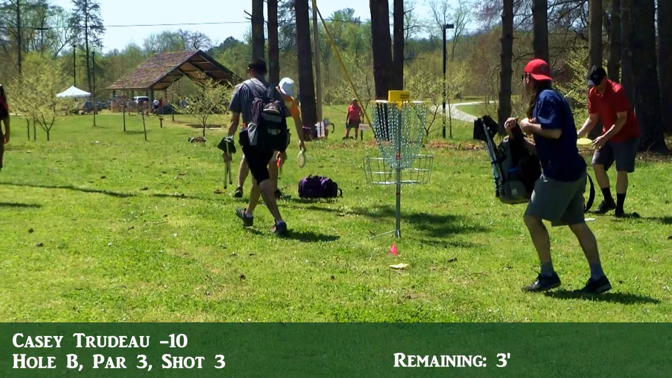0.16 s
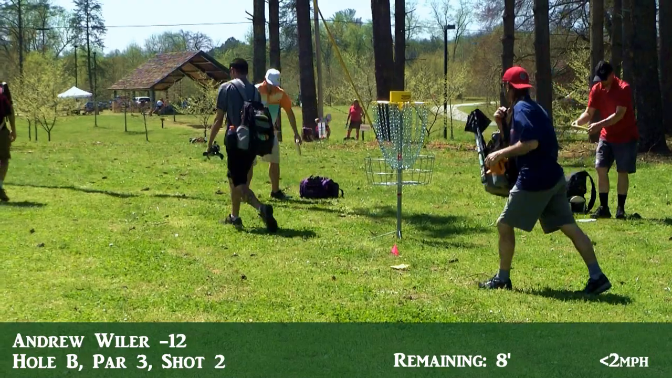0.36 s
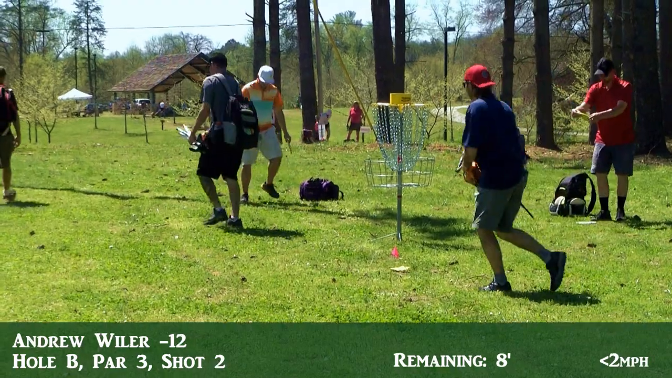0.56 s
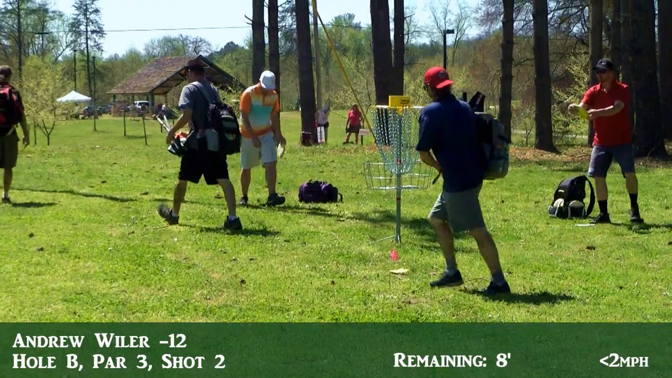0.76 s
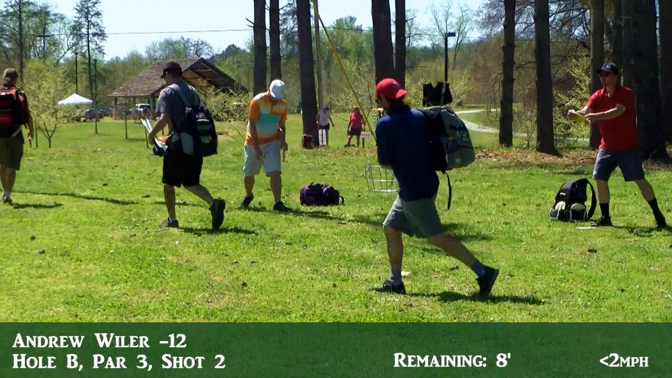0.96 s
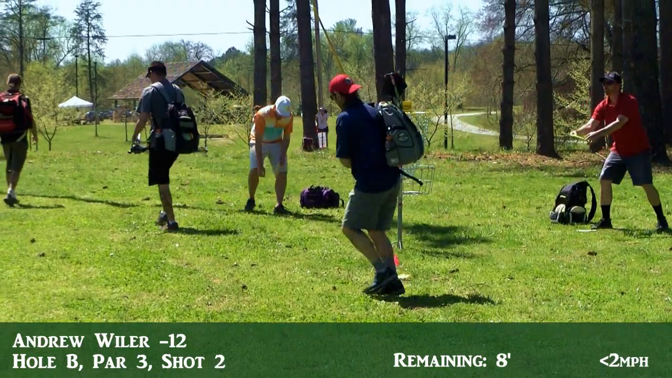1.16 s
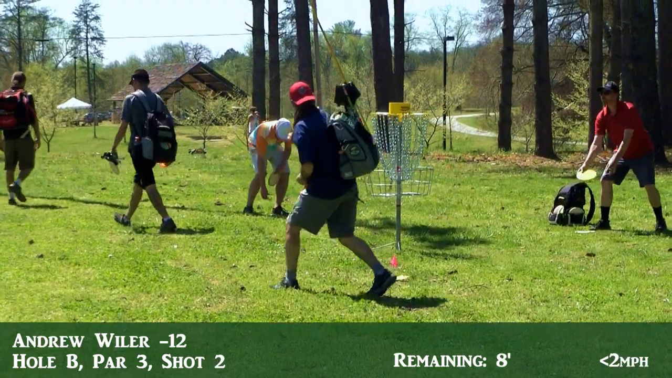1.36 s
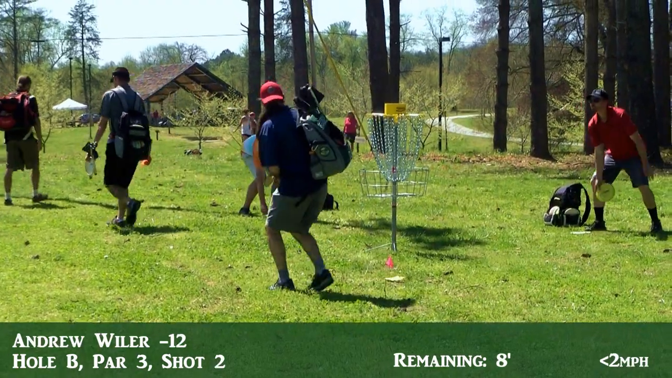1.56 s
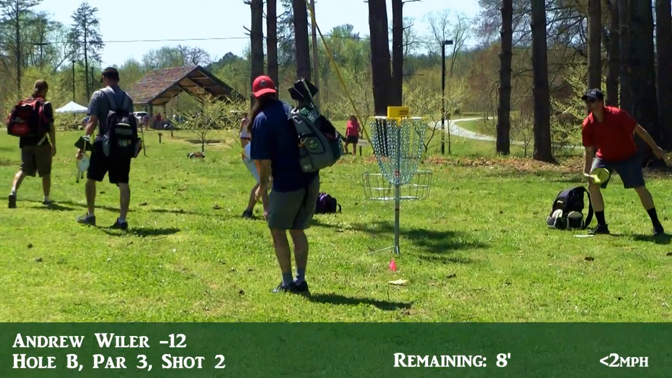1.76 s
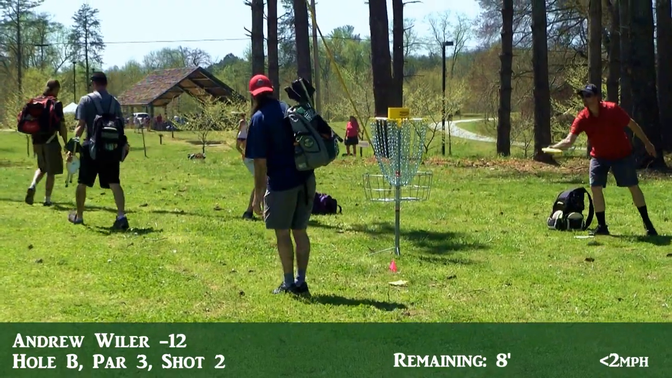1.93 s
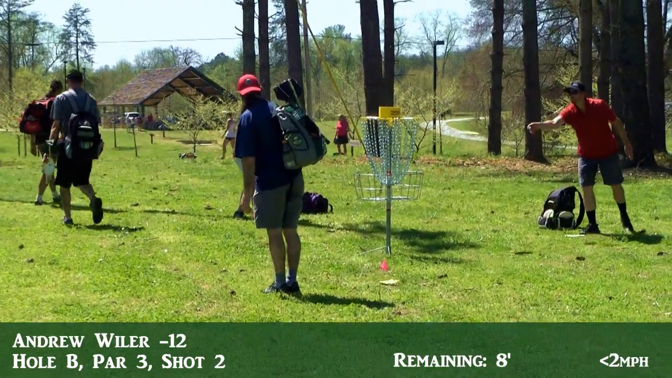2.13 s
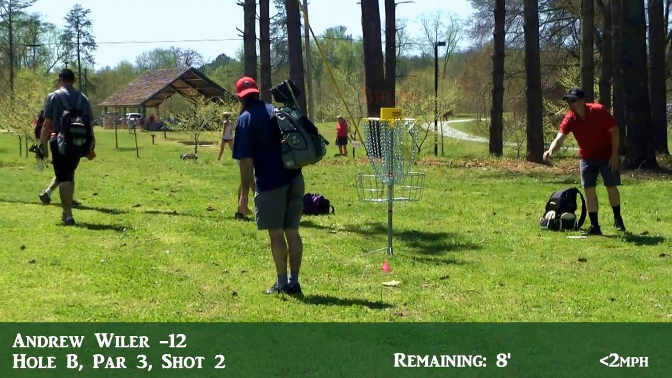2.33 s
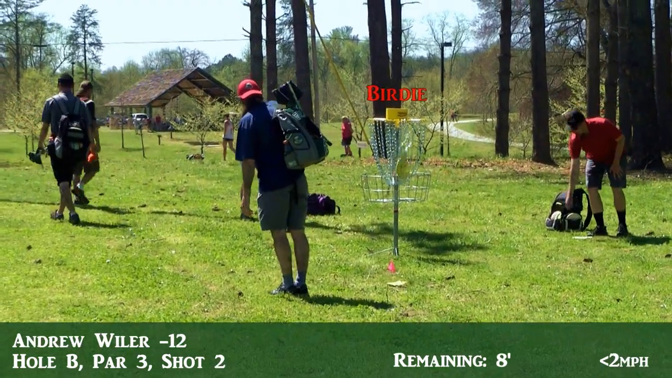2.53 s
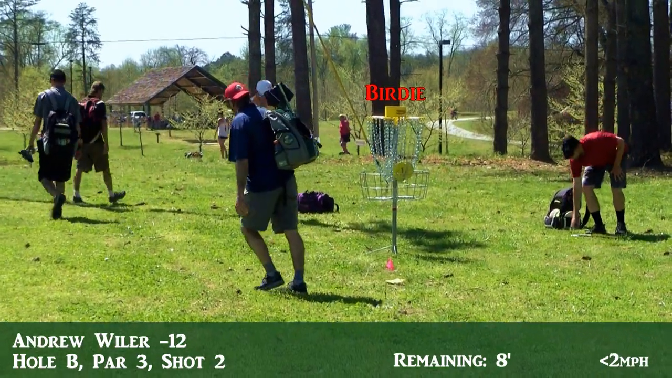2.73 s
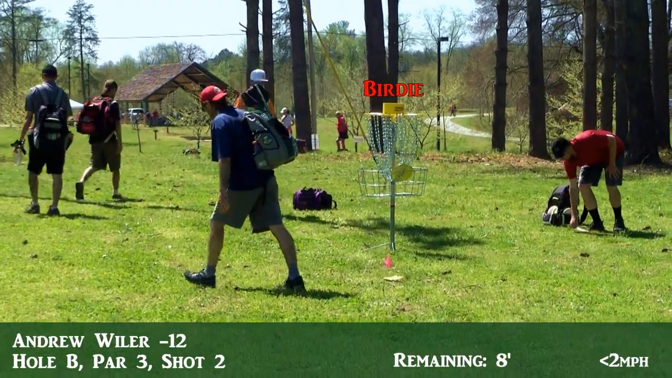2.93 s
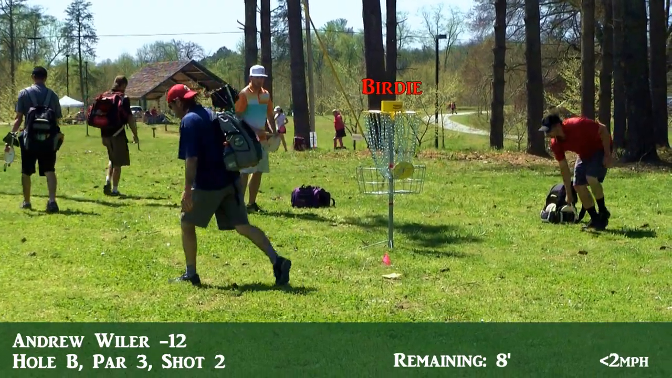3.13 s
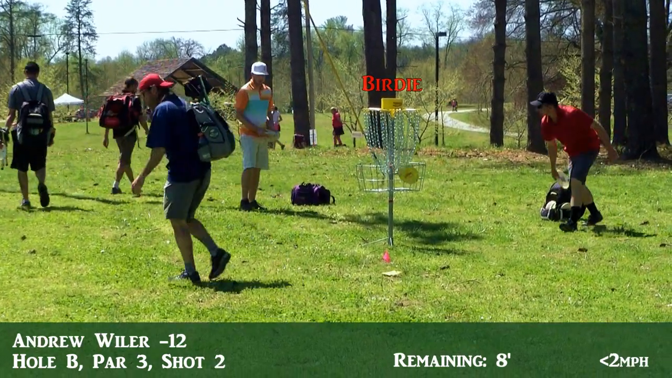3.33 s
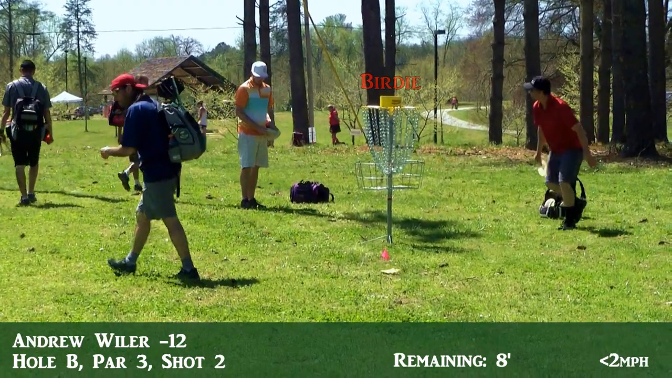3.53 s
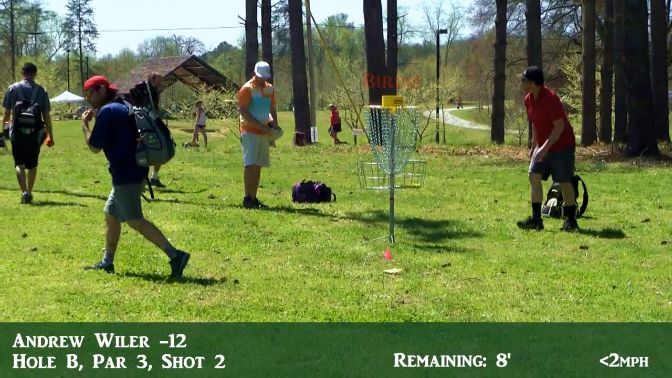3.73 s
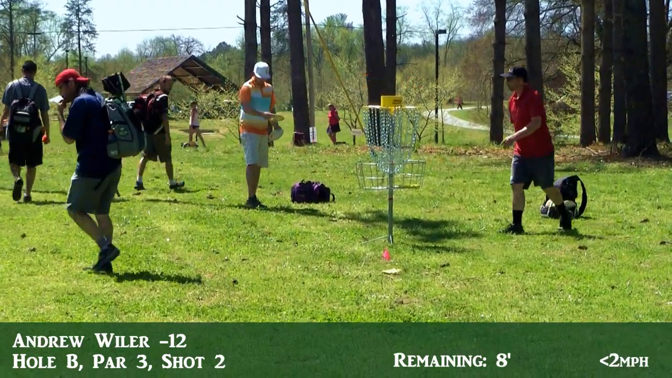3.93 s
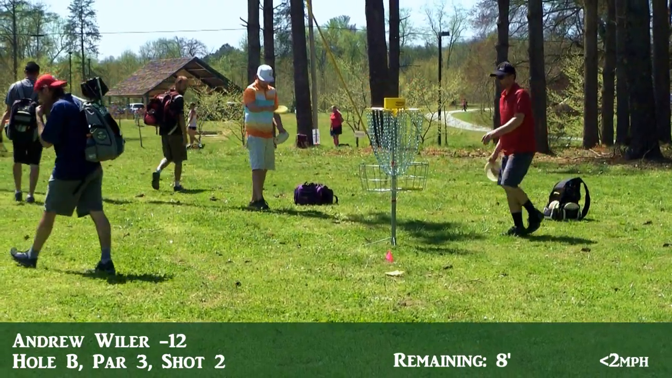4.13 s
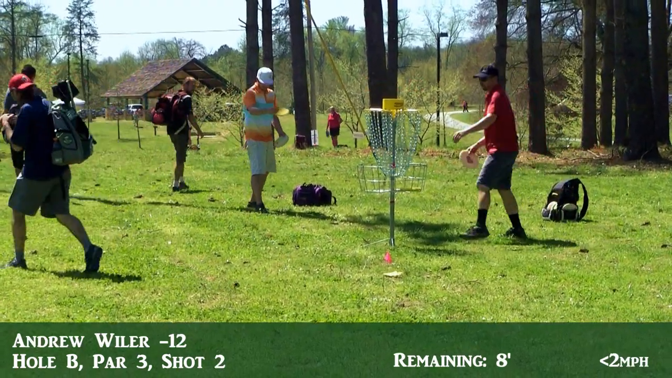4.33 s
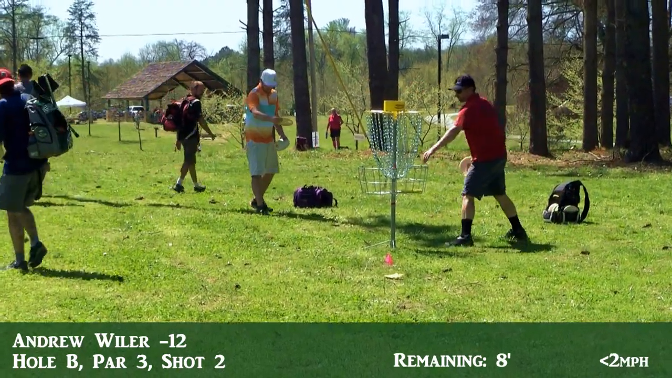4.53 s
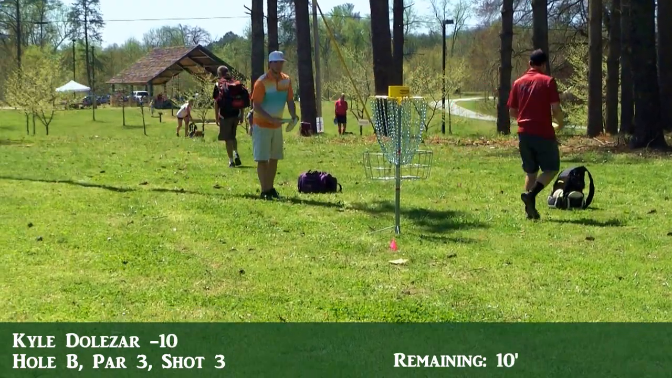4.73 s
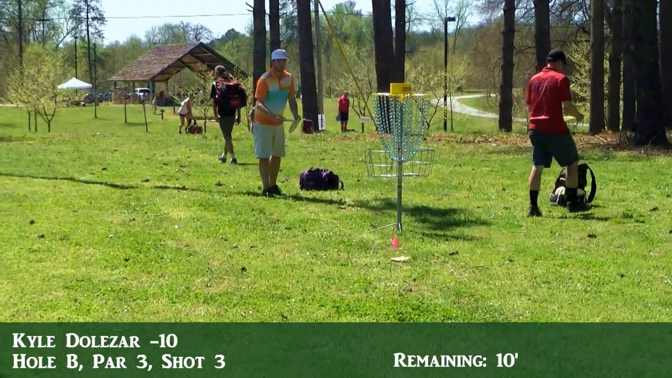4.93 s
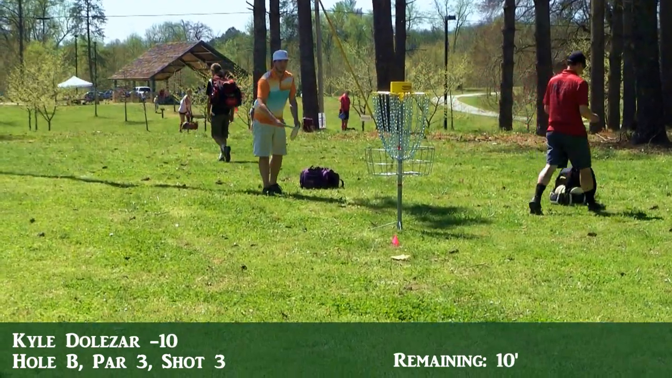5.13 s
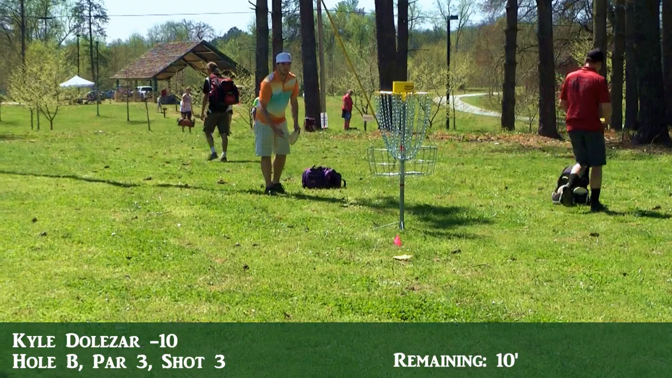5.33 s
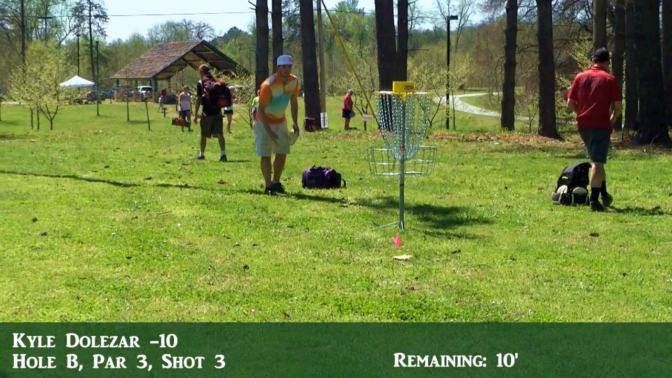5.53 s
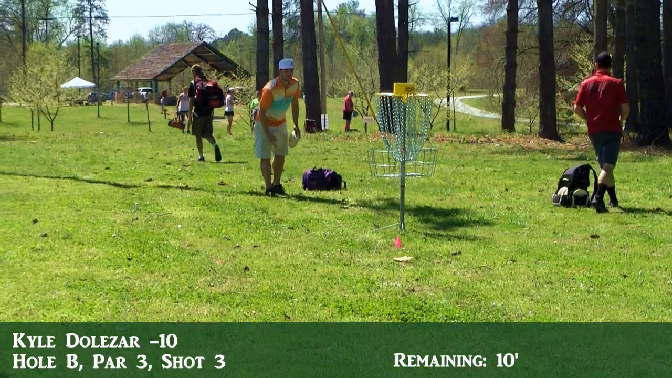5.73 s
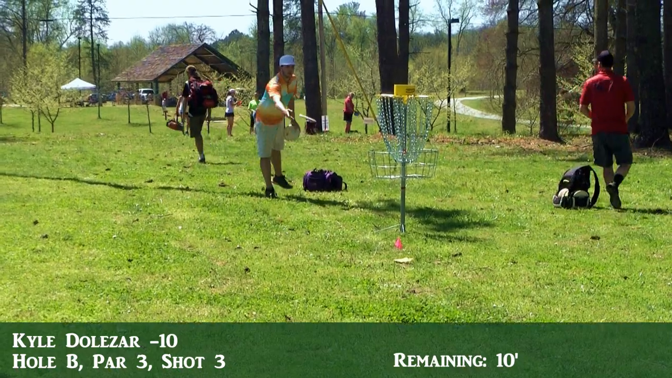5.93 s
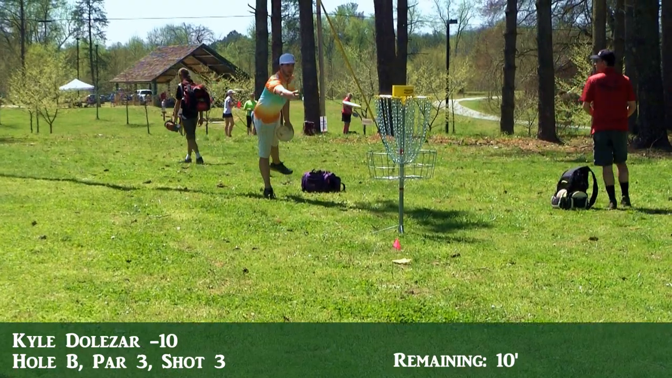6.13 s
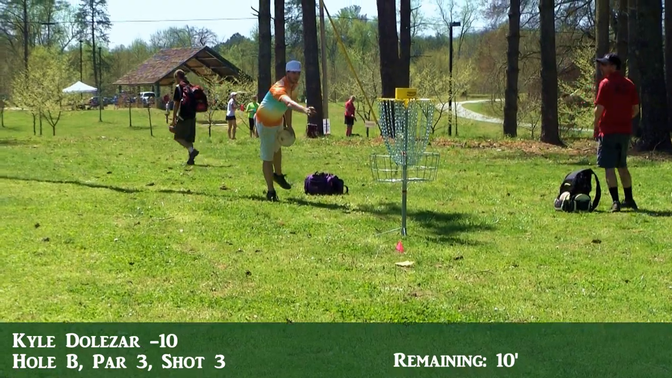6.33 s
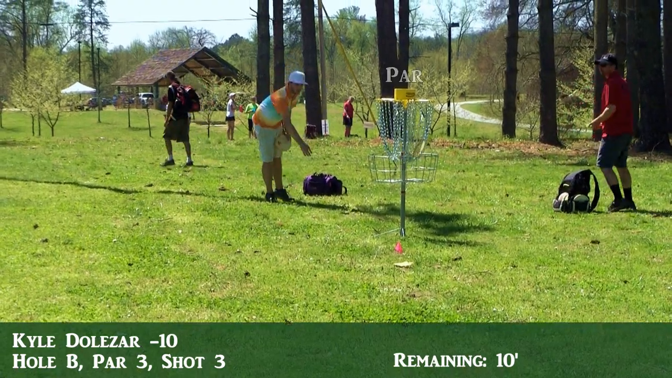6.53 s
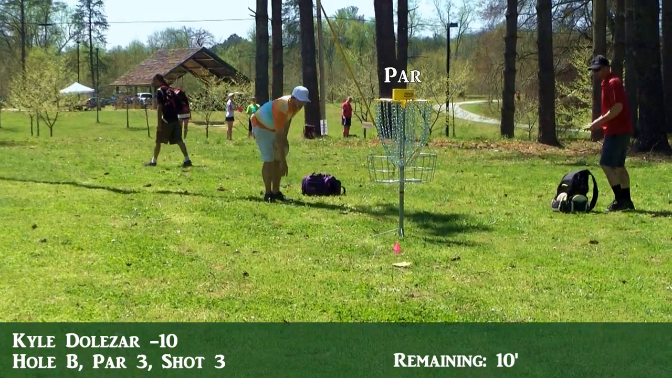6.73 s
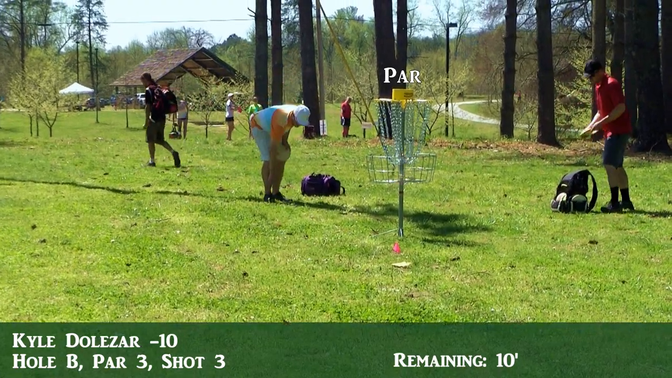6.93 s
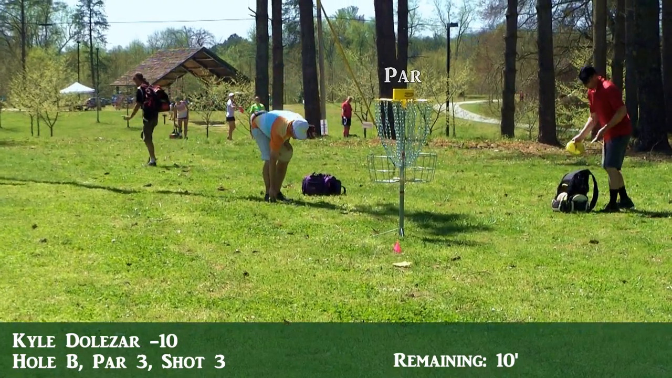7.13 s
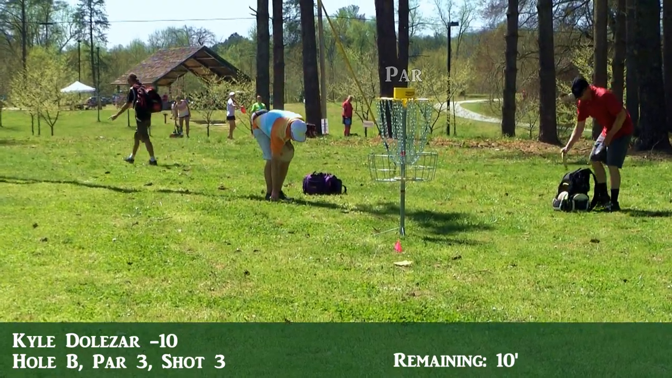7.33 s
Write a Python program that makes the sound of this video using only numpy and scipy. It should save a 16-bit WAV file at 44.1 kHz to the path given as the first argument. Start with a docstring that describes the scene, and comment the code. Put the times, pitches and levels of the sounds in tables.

```python
"""The hanging chains of a steel disc basket, hit by two putts, clatter, jingle and sway on: random link contacts
click and ring modal strands. The ring that gathers them chimes as decaying steel modes; single links clink.
The plastic disc slaps as coloured, quickly dying bursts. Players snap twigs and gear and brush the grass in
crackles; a bird chips once in gliding sines. Behind lie a slow engine drone of sine orders, far traffic of
drifting coloured noise, a faint echo from the trees and a trace of coloured noise, opposite in the two ears."""
import sys
import numpy as np
from scipy import signal
from scipy.fft import rfft, irfft, next_fast_len
from scipy.io import wavfile
from scipy.ndimage import uniform_filter1d, map_coordinates

SR = 44100
rng = np.random.default_rng(int(sys.argv[2]) if len(sys.argv) > 2 else 0)


def store_pcm(level_fs):
    """Save levels as 16-bit WAV."""
    pcm = np.round(np.clip(level_fs, -1, 1) * 32767).astype(np.int16)
    wavfile.write(sys.argv[1], SR, np.atleast_2d(pcm).T)


N = 329802
T = np.arange(N) / SR
BRIEF = T[:SR * 3 // 5]  # time within one ringing sound
TOP_HZ = 15800  # upper band limit


def amp(db):
    """Decibels to gain."""
    return 10 ** (np.asarray(db) / 20)


def unit(x):
    """Scale to rms 1."""
    return x / np.sqrt(np.mean(x ** 2) + 1e-20)


def along(points, hz):
    """(Hz, value) points read on a log axis."""
    f, v = np.transpose(points)
    return np.interp(np.log(hz + 1), np.log(f + 1), v)


def curve(rows, axis=1):
    """One column of a table, one value per sample."""
    rows = np.asarray(rows)
    return np.interp(T, rows[:, 0], rows[:, axis])


def fade(t, t60):
    """Free decay by 60 dB in t60."""
    return np.exp(-np.log(1000) * t / t60)


def swell(s, sigma_s):
    """Gaussian rise and fall about time s."""
    return np.exp(-np.minimum(((T - s) / sigma_s) ** 2, 100) / 2)


def wobble(rate_hz):
    """A smooth random curve, rate_hz knots a second."""
    knots = rng.standard_normal(int(N * rate_hz / SR) + 4)
    return map_coordinates(knots, [T * rate_hz])


def add(track, s, sound):
    """Mix a sound into a track at time s."""
    part = track[round(s * SR):][:len(sound)]
    part += sound[:len(part)]


def colour(x, spectrum, size=4096):
    """Causal minimum-phase filter with the given spectrum; white input keeps its power."""
    gain = unit(amp(along(spectrum, np.fft.rfftfreq(size, 1 / SR))))
    cepstrum = irfft(np.log(gain))
    cepstrum[1:size // 2] *= 2
    cepstrum[size // 2 + 1:] = 0
    response = irfft(np.exp(rfft(cepstrum)))
    return signal.fftconvolve(x, response)[:len(x)]


def contacts(rate_hz, spread_db, size=900):
    """Random impulses of uneven force, rate_hz a second, with a steady mean power near 1."""
    force = amp(spread_db * rng.standard_normal(N)) * rng.choice([-1, 1], N)
    hits = (rng.random(N) < rate_hz / SR) * force
    power = np.abs(uniform_filter1d(hits ** 2, size))
    return hits / np.sqrt(power + 1.03 * rate_hz / SR)


def shaken(touches, response):
    """A body rung by a train of touches, at the power of the train."""
    return signal.fftconvolve(touches, response / np.linalg.norm(response))[:N]


def chime(modes, scatter_db, detune=0, bright_db=0, waver_hz=0, centre_hz=4300):
    """Steel after one touch: modes at chance strengths, pitch wavering as links press on it; starts at rms 1."""
    hz, db, t60 = np.transpose(modes)
    strength, tuning, phase = rng.standard_normal((3, len(hz)))
    gain = amp(db + scatter_db * strength + bright_db * np.log2(hz / centre_hz))
    knots = rng.standard_normal(size=(len(hz), 48))
    knot_s = np.linspace(0, BRIEF[-1], 48)
    drift = np.array([np.interp(BRIEF, knot_s, row) for row in knots])
    pitch_hz = hz[:, None] * (1 + detune * tuning[:, None])
    pitch_hz = pitch_hz + waver_hz * np.sqrt(hz / centre_hz)[:, None] * drift
    cycles = np.cumsum(pitch_hz, axis=1) / SR + phase[:, None]
    waves = np.sin(2 * np.pi * cycles) * fade(BRIEF, t60[:, None])
    return gain @ waves * np.sqrt(2) / np.linalg.norm(gain)


def raps(rows, spectrum):
    """Dull bodies: bursts that die at once, coloured by the material; the pitch ratio shifts the spectrum."""
    out, t = np.zeros(N), T[:SR // 2]
    for s, db, t60, pitch in rows:
        burst = rng.standard_normal(len(t)) * fade(t, t60)
        add(out, s, amp(db) * colour(burst, np.multiply(spectrum, [pitch, 1])))
    return out


# side noise spectrum: (frequency [Hz], relative density [dB per Hz])
SIDE_NOISE_SPECTRUM = [(25, 2), (60, 0), (150, 2.5), (350, -3), (700, 1), (1100, -9.5), (2500, -22),
                       (4500, -10.5), (15000, -9)]
SIDE_NOISE_DB = -74


def side_noise():
    """Faint coloured noise, to be added with opposite sign in the two ears."""
    return amp(SIDE_NOISE_DB) * colour(rng.standard_normal(N), SIDE_NOISE_SPECTRUM)


# tyre noise spectrum: (frequency [Hz], relative density [dB per Hz])
TRAFFIC_SPECTRUM = [(25, -26.5), (45, -31.5), (65, -12.5), (100, -7.5), (150, -3), (210, -7), (300, -9.5),
                    (500, -6), (950, 1), (1500, -3), (2200, -8.5), (3500, -22), (6000, -30), (12000, -31),
                    (15800, -36)]
TRAFFIC_DB, TRAFFIC_DRIFT_DB = -48, 1.77


def traffic(patchy_db):
    """Far tyre noise, uneven in time-frequency patches, its level drifting slowly."""
    z = signal.stft(rng.standard_normal(N), nperseg=1024)[2]
    field = uniform_filter1d(rng.standard_normal(z.shape), size=7, axis=0)
    field = uniform_filter1d(field, size=12, axis=1)
    rush = signal.istft(z * amp(patchy_db * unit(field)), nperseg=1024)[1][:N]
    level_db = TRAFFIC_DB + TRAFFIC_DRIFT_DB * wobble(1.852)
    return amp(level_db) * unit(colour(rush, TRAFFIC_SPECTRUM))


# distant engine: (time [s], speed [turns per s], level before body gain [dB])
ENGINE_RUN = [(0, 37, -67), (1.2, 36.6, -65), (3.1, 35, -64), (4.7, 34, -60), (4.85, 31, -62),
              (5.3, 31.9, -61), (6.2, 34, -63.5), (7.48, 31.4, -67)]
# fixed peaks and dips that the orders slide through: (frequency [Hz], gain [dB])
ENGINE_BODY_GAIN = [(63, -5.5), (75, -6.5), (96, 1.5), (108, -2.5), (126, -17), (138, -2), (165, -2.5),
                    (174, -27.5), (192, -1.5), (220, -20)]


def engine(count=5):
    """Orders of a far engine slide through fixed peaks; the air makes each swell and fade."""
    speed_hz, level_db = curve(ENGINE_RUN), curve(ENGINE_RUN, axis=2)
    turn = 2 * np.pi * np.cumsum(speed_hz * (1 + 0.0023 * wobble(5.77))) / SR
    drone = np.zeros(N)
    for k in range(2, 2 + count):
        order_db = level_db + along(ENGINE_BODY_GAIN, k * speed_hz) + 0.83 * wobble(3.7)
        drone += np.sqrt(2) * amp(order_db) * np.sin(k * turn)
    return drone


# tree echo: (frequency [Hz], t60 [s])
TREE_DECAY = [(200, 0.33), (2000, 0.59), (6000, 0.043), (14000, 0.58)]


def trees(x):
    """The trunks scatter back a noise tail that decays at a different rate in each band."""
    hz, t, z = signal.stft(rng.standard_normal(SR // 2), SR, nperseg=256)
    tail = signal.istft(z * fade(t, along(TREE_DECAY, hz)[:, None]), SR, nperseg=256)[1]
    return shaken(x, tail)


# strokes of the chip: (time [s], length [s], start pitch [Hz], end pitch [Hz], level [dB])
CHIP_STROKES = [(4.91, .009, 2330, 3100, -50), (4.922, 0.02, 3280, 2640, -50),
                (4.955, .006, 2650, 3700, -51)]


def bird():
    """One short chip of gliding sines: up, down and up again."""
    out = np.zeros(N)
    for s, length_s, from_hz, to_hz, db in CHIP_STROKES:
        hz = np.linspace(from_hz, to_hz, round(length_s * SR))
        tone = np.sqrt(2) * np.sin(2 * np.pi * np.cumsum(hz) / SR)
        add(out, s, amp(db) * np.hanning(len(hz)) * tone)
    return out


# shoes and bags on grass: (time of peak [s], relative level [dB], Gaussian sigma [s])
GRASS_BRUSHES = [(.315, -64, 0.022), (.47, -70, 0.043), (0.89, -70, 0.035), (1.266, -63, 0.06),
                 (1.41, -62, 0.027), (1.55, -64.5, 0.072), (1.72, -60, 0.023), (1.799, -61, 0.017),
                 (2.092, -68.5, 0.07), (5.005, -73, 0.039), (5.27, -66, 0.03)]
# grass spectrum: (frequency [Hz], relative density [dB per Hz])
GRASS_SPECTRUM = [(500, -27.5), (2500, -1.5), (5000, -7), (8500, -2.5), (12000, -6), (16000, -24)]


def grass():
    """Shoes and bags brush along: fine random crackles over noise, shaped by Gaussian strokes."""
    strokes = sum(amp(db) * swell(s, sigma_s) for s, db, sigma_s in GRASS_BRUSHES)
    crackle = amp(2.0) * contacts(1500, spread_db=9.5)
    hiss = amp(-2) * rng.standard_normal(N)
    return strokes * colour(crackle + hiss, GRASS_SPECTRUM)


# twigs and gear: (time [s], level [dB], t60 [s], pitch [ratio])
TWIG_SNAPS = [(.4957, -37, 0.032, 1), (.909, -43, 0.042, 0.87), (1.209, -46, 0.02, 4.4),
              (2.079, -51, .008, 3.2)]
# twig spectrum at pitch 1: (frequency [Hz], relative density [dB per Hz])
TWIG_SPECTRUM = [(300, -21), (1500, -3), (2900, 5.5), (4500, -1), (8000, -5.5), (12000, -12), (16000, -21)]


def snaps():
    """Twigs and gear snap in short coloured bursts as the players walk."""
    return raps(TWIG_SNAPS, TWIG_SPECTRUM)


# disc on chains, pole and tray: (time [s], level [dB], t60 [s], pitch [ratio])
DISC_KNOCKS = [(2.442, -24.5, 0.034, 1.14), (2.53, -36, 0.078, 0.48), (2.644, -37, 0.04, 0.94),
               (2.733, -33, 0.054, .8), (2.847, -33.5, 0.081, 0.61), (3.548, -39, 0.072, 0.79),
               (3.57, -37, 0.077, 0.61), (3.72, -40.5, 0.39, 0.86), (6.4835, -13.5, 0.017, 0.96),
               (6.531, -25, 0.025, 0.44), (6.538, -24.5, 0.032, 0.58), (6.96, -36, .06, 0.76),
               (7.022, -34.5, 0.031, 0.82), (7.088, -26, 0.014, 0.77)]
# plastic disc spectrum at pitch 1: (frequency [Hz], relative density [dB per Hz])
DISC_SPECTRUM = [(40, -40.5), (500, -33), (950, -16), (1800, -1.5), (2400, -5.5), (3050, 0.5), (3900, -12),
                 (5200, -11.5), (7000, -17.5), (15000, -21)]


def disc():
    """The plastic disc slaps chains, pole and tray in damped bursts."""
    return raps(DISC_KNOCKS, DISC_SPECTRUM)


# blows on the ring: (time [s], level [dB], brightness [dB per octave], time until the faster fade [s])
RING_STRIKES = [(2.113, -61, 24, .02), (2.569, -18, -1, 0.058), (2.646, -23, -1.5, 0.025),
                (2.674, -29.5, -3, 0.17), (2.732, -40, -3, 0.22), (2.89, -34.5, 0, .39),
                (3.587, -39, 2, .5), (3.605, -33.5, 10.5, 0.034), (4.661, -34, -2, .12),
                (5.374, -56.5, -1, 0.046), (6.531, -23.5, 10, 0.14), (6.551, -19.5, 6.5, 0.0039),
                (6.56, -28.5, -2, 0.035), (6.615, -21.5, 6, 0.1), (6.758, -33.5, -1, 0.023),
                (6.798, -36, -6, 0.022), (6.819, -31.5, 1.5, 0.11), (6.962, -27, 3.5, .45)]
# ring modes: (frequency [Hz], relative level [dB], t60 before the faster fade [s])
RING_MODES = [(1530, -1, 1), (1734, -15, 0.84), (1980, -7, 0.37), (4202, 1, 0.27), (4197, -2, 0.29),
              (4287, -1, 1.05), (4330, 0, 0.5), (4430, -13, 0.29), (4460, -4.5, 0.41), (4770, -7.5, 0.6),
              (5028, -10.5, 0.3), (6800, -12.5, 0.17), (8220, 4, .32), (8150, -6, 0.34), (8262, -0.5, 0.41),
              (7930, -15, 0.36), (8400, -6, 0.28), (8670, -9.5, 0.26), (8840, -11.5, 0.38),
              (9200, -17.5, 0.22), (9650, -29.5, 0.2586), (13480, -28.5, 0.45)]
# chain clatter spectrum: (frequency [Hz], relative density [dB per Hz])
CLATTER_SPECTRUM = [(30, -28), (150, -7.5), (400, -28), (1000, -1.5), (2100, 6.5), (3000, 0.5), (4500, 3.5),
                    (5400, 5), (6300, -2.5), (7300, -2), (9000, 3.5), (11500, 1.5), (13000, 6),
                    (15500, -13.5)]
LINGER_DB, LINGER_ABOVE_HZ = -11, 3000  # chains smother the low modes


def ring():
    """The ring chimes with a crack, then fades faster after a set time; its high modes linger."""
    out = np.zeros(N)
    high = [mode for mode in RING_MODES if mode[0] > LINGER_ABOVE_HZ]
    for s, db, bright_db, free_s in RING_STRIKES:
        tone = chime(RING_MODES, scatter_db=0.0, detune=.0004, bright_db=bright_db, waver_hz=6)
        tone = tone * fade(np.maximum(BRIEF - free_s, 0), 0.13)
        linger = chime(high, scatter_db=3.0, detune=.001, bright_db=bright_db, waver_hz=3)
        crack = colour(rng.standard_normal(len(BRIEF)) * fade(BRIEF, 0.064), CLATTER_SPECTRUM)
        add(out, s, amp(db) * (tone + amp(LINGER_DB) * linger + amp(-7.0) * crack))
    return out


# single link knocks: (time [s], level before swell and damping [dB])
LINK_CLINKS = [(.308, -50), (1.952, -59), (2.475, -20.5), (2.531, -17), (3.26, -34.5), (3.658, -33.5),
               (3.715, -33), (4.372, -33), (4.611, -41.5), (5.323, -54), (5.392, -48), (6.042, -58),
               (6.503, -10.5), (6.54, -14.5), (6.66, -20.5), (6.742, -24.5), (7.068, -27)]
# link modes: (frequency [Hz], relative level [dB], undamped t60 [s])
LINK_MODES = [(3940, -23.5, 0.29), (5380, -26.5, .06), (7100, -18.5, 0.11), (8140, -17.5, 0.25),
              (11450, -8, 0.07), (11910, 3, 0.13), (12020, -9, 0.42), (11970, -1, 0.068), (12300, -7, 0.14),
              (12300, -13.5, .1), (12750, -9.5, 0.13), (12680, -14.5, 0.9), (13300, -27, 0.13),
              (13800, -28, 0.14)]


def clinks():
    """Single harder knocks of link on link, swelling as the neighbours join in."""
    out = np.zeros(N)
    envelope = fade(BRIEF, 0.32) * (1 - fade(BRIEF, 0.019))
    for s, db in LINK_CLINKS:
        add(out, s, amp(db) * envelope * chime(LINK_MODES, scatter_db=3.5, detune=0.0029))
    return out


SHOVE_RISE_S, SHOVE_JINGLE_T60_S, SHOVE_CLATTER_T60_S = 0.0016, 0.18, 0.27


def push(s, length_s, t60):
    """Quick rise at time s, hold, free decay."""
    rise = np.clip((T - s) / SHOVE_RISE_S, 0, 1)
    return rise * fade(np.clip(T - s - length_s, 0, 2 * t60), t60)


# sway after each putt: (time [s], relative jingle level [dB], settling [dB per s])
PUTT_SWAYS = [(2.444, -35.5, 12.5), (6.487, -28, 15.5)]
# disc flies in, drops, rebounds: (time [s], relative jingle [dB], relative clatter [dB], push length [s])
DISC_SHOVES = [(2.441, -18, -36.5, 0.049), (2.57, -24.5, -37, 0.012), (2.645, -42, -46, 0.017),
               (2.733, -48.5, -45, 0.012), (2.859, -34, -42, 0.044), (3.588, -39, -53.5, 0.027),
               (4.662, -45, -50.5, .01), (6.486, -23, -34, 0.098), (6.605, -31, -42, 0.036),
               (6.755, -43, -47.5, 0.03), (6.82, -47, -47.5, 0.022), (6.962, -32, -39, 0.01),
               (7.045, -37, -50.5, 0.015)]
# strands swing back together: (time of closest [s], relative jingle level [dB], Gaussian sigma [s])
STRAND_SWINGS = [(3.1, -38.5, 0.014), (3.248, -43.5, .04), (3.33, -42, 0.012), (3.462, -42.5, 0.039),
                 (3.706, -44, 0.029), (3.868, -49.5, 0.034), (4.151, -43, .012), (4.193, -43, 0.021),
                 (4.379, -39, 0.022), (4.443, -46.5, 0.017), (4.618, -48.5, .01), (6.95, -35, .012),
                 (7.12, -36.5, 0.072), (7.249, -40.5, 0.048), (7.345, -44, 0.021)]
SWAY_CLATTER_DB, SWING_CLATTER_DB = -17.5, -16.5  # re jingle
SWAY_FLICKER_DB = 1  # uneven sway


def shaking():
    """Strength of the links' jingle and of their clatter: sway, swings and shoves add in power."""
    sway, swings, jingle, clatter = np.zeros((4, N))
    for s, db, settle_db_per_s in PUTT_SWAYS:
        level_db = db - settle_db_per_s * np.maximum(T - s, 0) + SWAY_FLICKER_DB * wobble(18)
        sway += (amp(level_db) * (T >= s)) ** 2
    for s, db, sigma_s in STRAND_SWINGS:
        swings += (amp(db) * swell(s, sigma_s)) ** 2
    for s, jingle_db, clatter_db, length_s in DISC_SHOVES:
        jingle += (amp(jingle_db) * push(s, length_s, SHOVE_JINGLE_T60_S)) ** 2
        clatter += (amp(clatter_db) * push(s, length_s, SHOVE_CLATTER_T60_S)) ** 2
    clatter += amp(SWAY_CLATTER_DB) ** 2 * sway + amp(SWING_CLATTER_DB) ** 2 * swings
    return np.sqrt(jingle + sway + swings), np.sqrt(clatter)


def tinkle(t60, count=24):
    """Many quickly damped modes of a strand, drawn anew for every strand."""
    t = T[:SR // 5]
    hz, phase = rng.random((2, count)) * [[TOP_HZ], [1]]
    waves = np.sin(2 * np.pi * (np.outer(hz, t) + phase[:, None]))
    return waves.sum(axis=0) * fade(t, t60)


def chains(count=12):
    """Links collide, more often the harder they are shaken; each contact clicks and rings one strand."""
    jingle, clatter = shaking()
    vigour = np.sqrt(clatter / clatter.max())
    touches = contacts(120 + 1100 * vigour, spread_db=4.5)
    strand = rng.integers(count, size=N)
    links, tinkles = np.zeros((2, N))
    for k in range(count):
        one = touches * (strand == k)
        links += shaken(one * jingle, chime(LINK_MODES, scatter_db=0, detune=0.0033))
        tinkles += shaken(one * clatter, tinkle(t60=0.054))
    # a contact is a short scrape that runs on through the neighbouring links
    run_on = fade(T[:SR // 10], 0.0017)
    scrape_power = signal.fftconvolve(touches ** 2, run_on / run_on.sum())[:N]
    scrape = np.sqrt(np.abs(scrape_power)) * rng.standard_normal(N)
    rattle = clatter * (amp(-1) * touches + amp(-1.5) * scrape)
    clicks = colour(rattle + amp(5.5) * tinkles, CLATTER_SPECTRUM)
    # hard shaking passes down the strands into the ring, which their weight keeps damped
    damped = chime(RING_MODES, scatter_db=2.5) * fade(BRIEF, 0.3)
    hum = shaken(touches * clatter * np.sqrt(vigour), damped)
    return amp(-1.4) * links + clicks + amp(3.5) * hum


def scene():
    """Everything stands straight ahead; only a trace of coloured noise is opposite in the two ears."""
    near = chains() + clinks() + ring() + disc() + snaps() + grass() + bird()
    mid = near + amp(-11) * trees(near) + engine() + traffic(patchy_db=0.77)
    side = side_noise()
    return np.array([mid + side, mid - side])


def record(dry):
    """Steep zero-phase low-pass at TOP_HZ."""
    m = next_fast_len(N + SR // 2)
    edge = 1 / np.sqrt(1 + (np.fft.rfftfreq(m, 1 / SR) / TOP_HZ) ** 300)
    return irfft(rfft(dry, m) * edge, m)[:, :N]


dry = scene()
out = record(dry)
store_pcm(out)
```